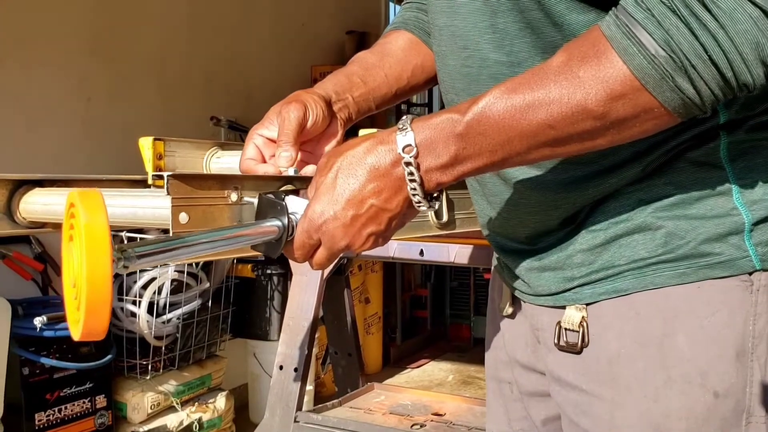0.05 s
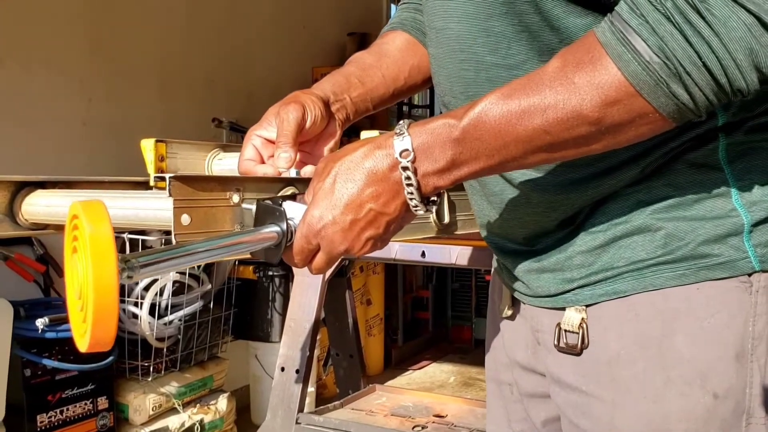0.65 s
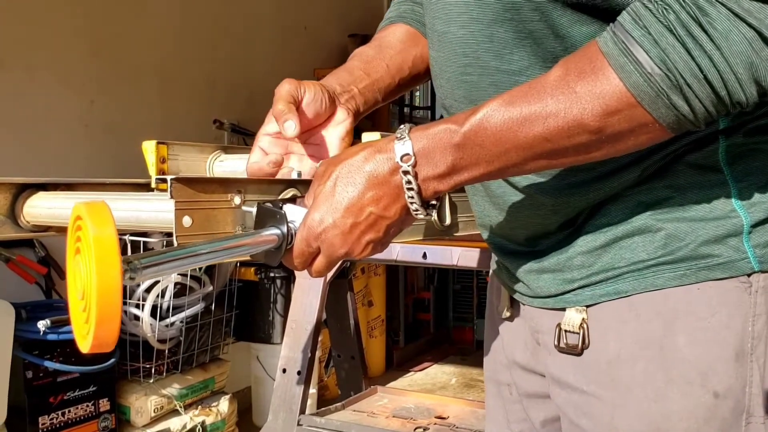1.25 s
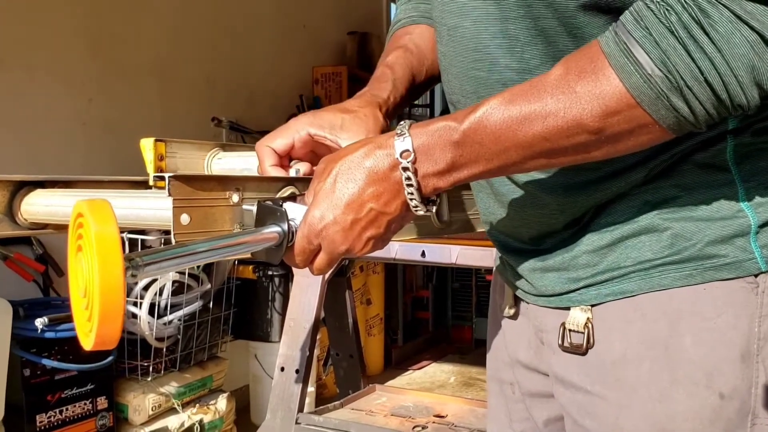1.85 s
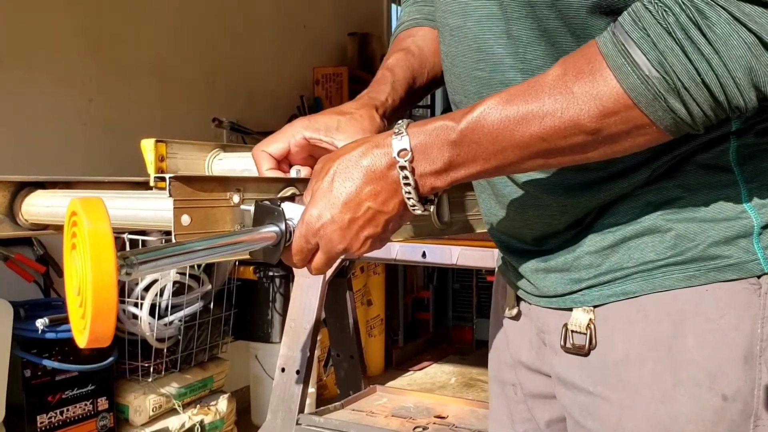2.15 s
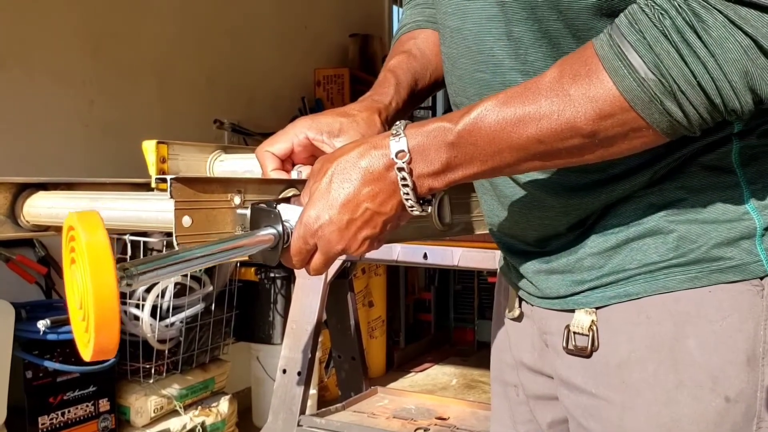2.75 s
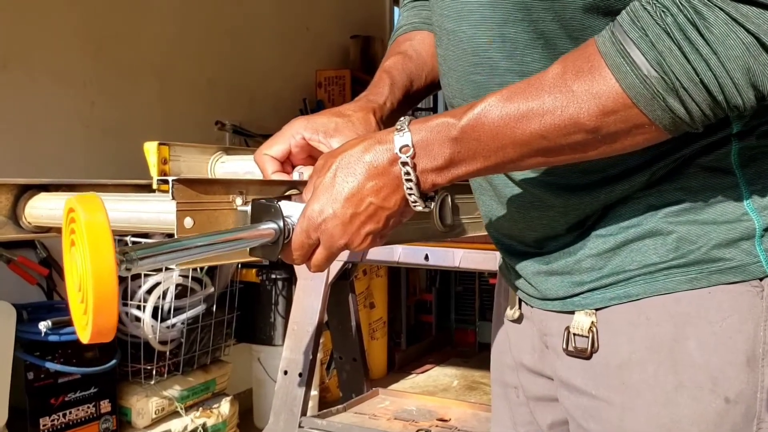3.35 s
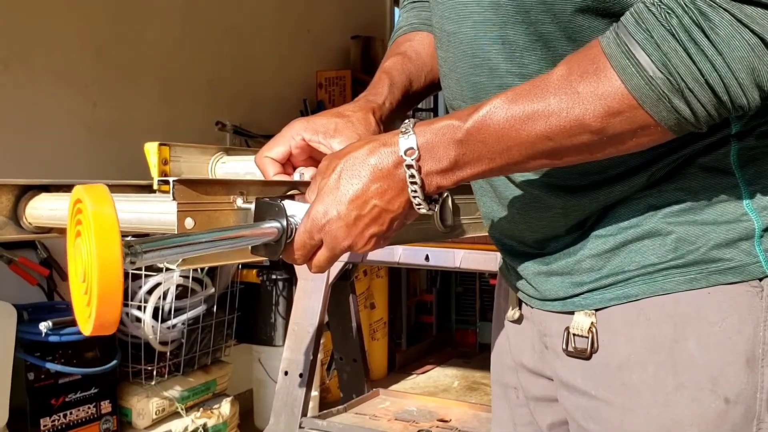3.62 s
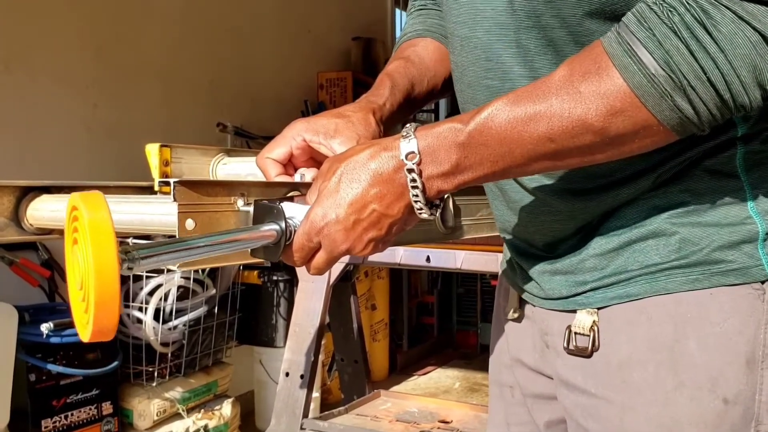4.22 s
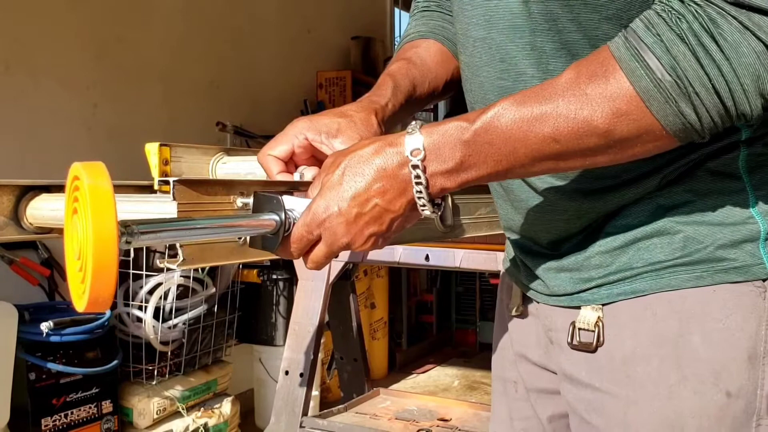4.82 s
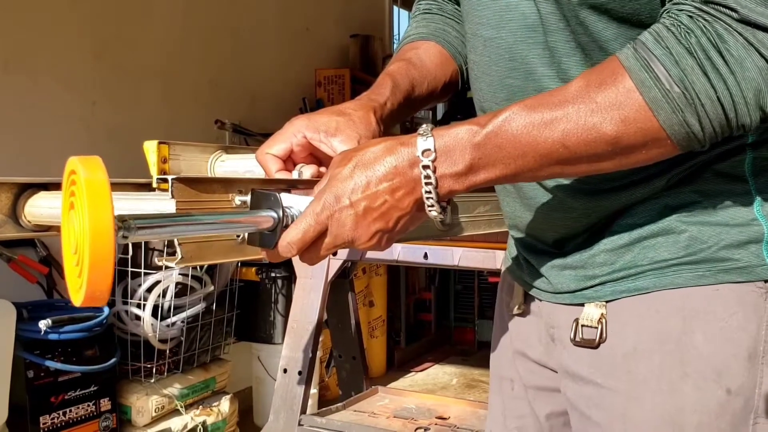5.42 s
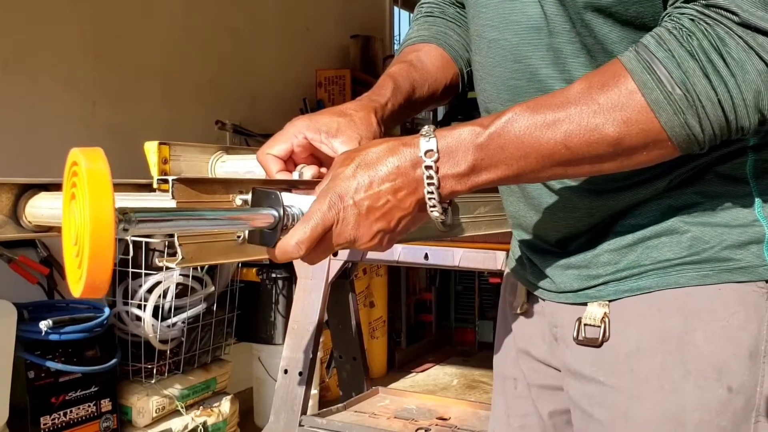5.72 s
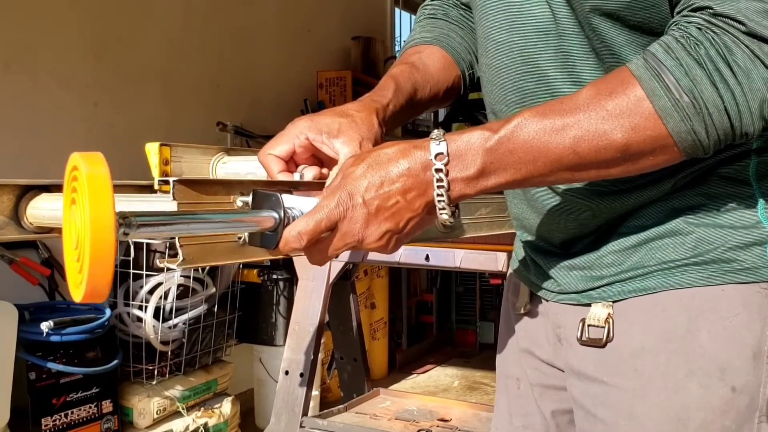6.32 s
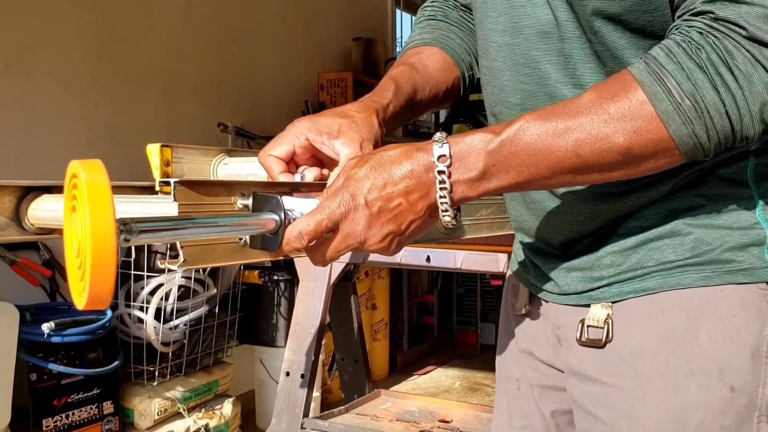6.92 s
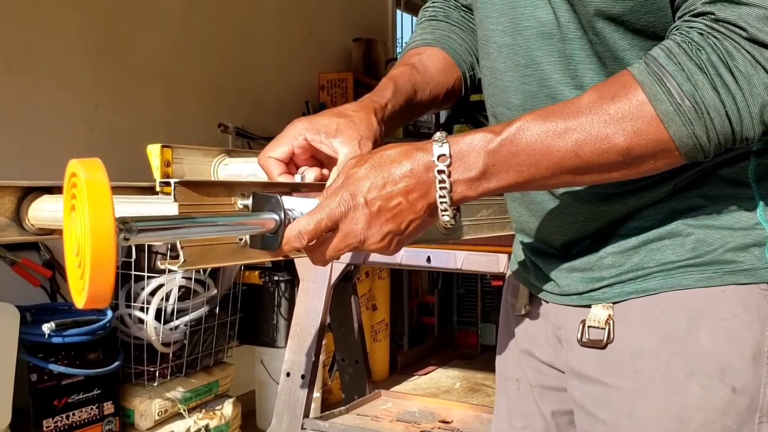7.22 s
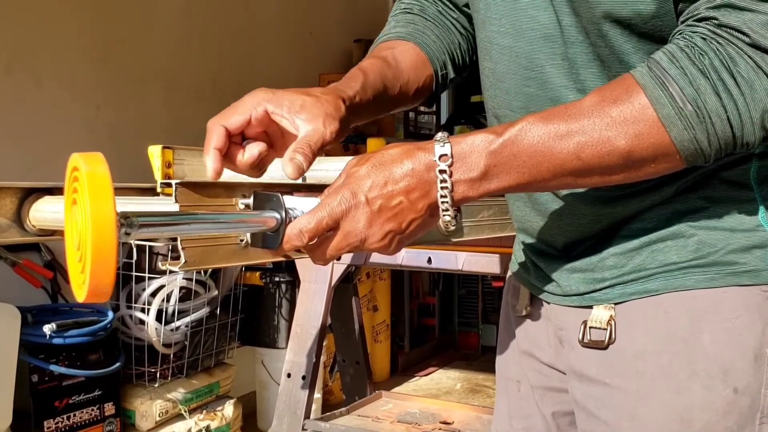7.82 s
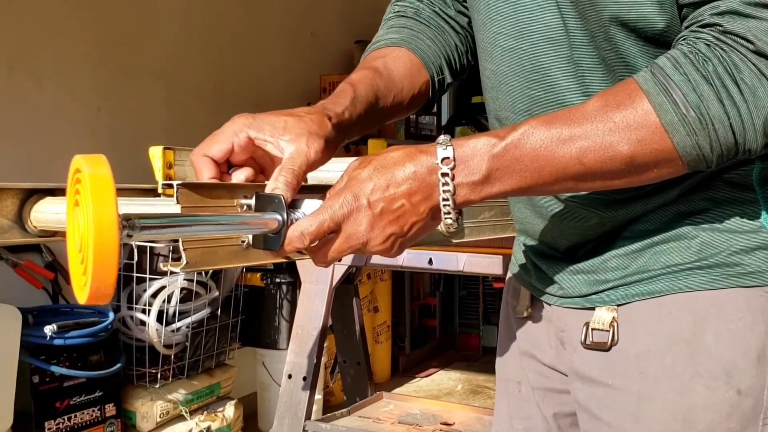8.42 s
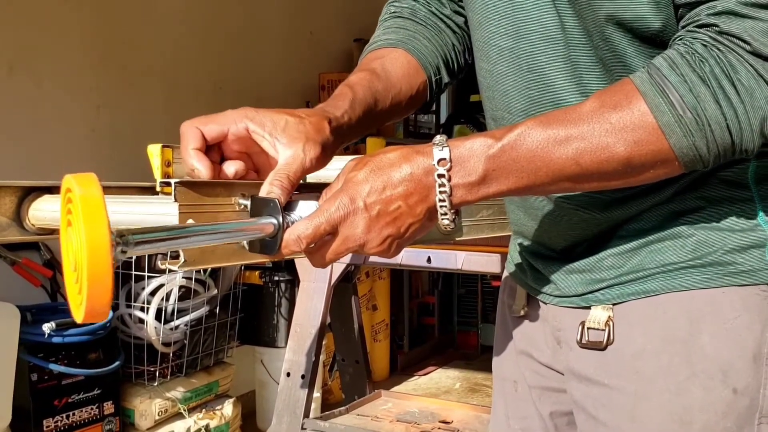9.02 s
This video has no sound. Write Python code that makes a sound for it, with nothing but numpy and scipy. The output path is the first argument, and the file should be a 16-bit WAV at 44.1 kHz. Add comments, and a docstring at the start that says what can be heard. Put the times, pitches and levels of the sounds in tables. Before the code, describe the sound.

A bolt scratches and clinks along an aluminium ladder rail, then drops into a steel bracket with a sharp clank. A metal tube thuds and knocks as it is rocked into line, its collar clacks into place, and a few faint scrapes and ticks follow. The sounds are close and slightly left, with a short echo from bare garage walls and a faint low machine hum behind.

```python
"""A steel leveller leg is fitted by hand to an aluminium ladder rail, heard close up in a garage.
A bolt scratches and taps along the rail and drops into its bracket; the tube knocks until its collar
seats. Each contact is a run of tiny slips that rings the metal, with small snaps and squeaks between.
The work sits nearer the left microphone of a stereo pair, and bare walls answer every contact.
Further off, a machine hums low through the walls under the steady air of the room."""
import sys
import numpy as np
from scipy import signal
from scipy.fft import rfft, irfft, next_fast_len
from scipy.io import wavfile

SR = 44100
rng = np.random.default_rng(int(sys.argv[2]) if len(sys.argv) > 2 else 0)


def wav_record(signal):
    """Record a signal, one row per channel, as 16-bit PCM in the file named by sys.argv[1]."""
    frames = np.transpose(np.atleast_2d(signal))
    bounded = np.clip(frames, -1, 1)
    # unit amplitude maps onto the largest positive 16-bit level
    quanta = np.round(bounded * 32767).astype(np.int16)
    wavfile.write(sys.argv[1], SR, quanta)


N = 403956

# The straight path leans left. Each row: frequency in Hz, dB added on the left and taken off the right.
LEFT_LEAN = [(500, 1.5), (2000, 2), (5000, 5), (11000, 12.5)]


def rail():
    """The bolt feels its way along the aluminium rail, which clinks."""
    taps = [(.204, -14.5, 16, -3, 0.5, 0.018), (.34, -19.5, 0, -9, -18, 0.15),
            (.461, -16, 12.5, 2.5, -10, 0.013), (.565, -12, 8.5, -3, -19, 0.019),
            (.577, -1.5, 1.5, 0.5, -19, 0.032), (.819, -6, -9, 5, -22, 0.014),
            (.851, -15, -10, -3, 6, .0024), (.858, 8, 1, 1, -9, 0.011), (.869, 1, 14.5, 3, -4, 0.035),
            (.922, -10.5, 4, 5.5, -26, 0.041), (1.01, -3.5, 7, -1, -6.5, 0.015),
            (1.895, -10, 9.5, -4.5, -9.5, 0.023), (1.937, -18.5, 15, -15, 4, 0.0059),
            (1.948, -24, 13, -3, -2, 0.0086)]  # rows as in blows()
    scratches = [(.146, -13.5, 0.12), (.461, -13.5, 0.068), (.756, -16.5, 0.055), (1.22, -31.5, 0.14),
                 (1.417, -37, 0.03), (1.71, -37, .04), (1.804, -26, 0.06), (2.255, -35, 0.018),
                 (2.384, -18, 0.12)]  # rows as in slides()
    modes = [(880, 5.5, 0.12), (905, -3, .06), (1295, -1, .07), (1682, -1.5, 0.08), (2165, 4.5, 0.05),
             (2660, -4, 0.05), (2860, -5, 0.05), (3275, -0.5, 0.06), (4030, -5, .04), (4075, 0, 0.08),
             (4320, -7, 0.04), (4785, 0.5, .05), (6030, -8, .08), (11400, 0, .02)]  # this and the next: rows as in contacts()
    radiation = [(450, -14), (800, -5), (1100, -7), (2500, -5), (4200, -4), (6000, 1), (9000, -3.5)]
    touches = blows(taps, bass_db=-22.0, middle_db=-3.5, bass_share=0.71, middle_share=0.5)
    touches += slides(scratches, bass_db=-11.5, middle_db=9, treble_db=-15.0, ring_db=0.5)
    return contacts(touches, modes, radiation, level_db=-4.0, modes_db=-16.0, rattle=0.0037,
                    clatter_t60=0.018, grit=0.5, slips_per_s=1700, room_db=3.0)


def bracket():
    """The bolt falls into the steel bracket and rebounds once."""
    clanks = [(2.568, -15, -26.5, 9.5, -13.5, 0.016), (2.579, 7, 0.5, 0, -14.5, .011),
              (2.585, 7, 1.5, 0.5, -6, .009), (2.597, -0.5, 5, -3, -8, .016),
              (2.727, -8.5, -3.5, -2.5, -12, 0.012)]  # rows as in blows()
    modes = [(500, -4, .1), (900, -2.5, 0.1), (1320, -7, 0.06), (2000, -3, .09), (2190, -2, 0.07),
             (3275, 1, 0.08), (3670, -6, .09), (3917, 8, 0.07), (4290, -8, 0.08), (4660, -2.5, .05),
             (5400, -2, 0.11), (6330, -2, .06), (6778, 2, .1), (11420, 4, .06)]  # this and the next: rows as in contacts()
    radiation = [(450, -6), (900, -2), (4000, -2), (9000, 1)]
    touches = blows(clanks, bass_db=-9.0, middle_db=6.0, bass_share=0.49, middle_share=0.94)
    return contacts(touches, modes, radiation, level_db=-1.5, modes_db=-13.5, rattle=0.0016,
                    clatter_t60=0.066, grit=0.93, slips_per_s=2500, room_db=1.5)


def tube():
    """The hand-held tube thuds and scrapes against the rail as it is rocked into line."""
    knocks = [(2.838, 3, 1, -17, -20, 0.0076), (2.849, -1.5, 0, -11, -7.5, 0.013),
              (2.98, -12, -7, 2, -15, 0.0039), (2.991, -17, 2, -1, -15, 0.0053),
              (3.111, -9.5, -4.5, 1, -21, 0.0029), (3.232, -15.5, 0, -0.5, -34, 0.0019),
              (3.757, -29, -3, -4.5, -7.5, 0.037), (3.82, -24, -14, -3, -11, 0.15),
              (4.019, -20, -1, 0, -22.5, 0.011), (4.178, -50, -2.5, 8.5, -16, 0.004),
              (4.364, -41, 7, 1, -29, 0.012), (4.758, -23, -4.5, 5.5, -17, 0.004),
              (4.951, -40, -12, 11.5, -39, 0.0022), (5.476, -4.5, 0.5, -2, -14.5, 0.0039),
              (6.129, -34, -6.5, 7.5, -27, .003), (8.602, -39.5, -6.5, -0.5, -14, 0.0039),
              (8.795, -40.5, -15, 0, 0.5, 0.0018), (8.863, -17, -22, 0, -23, .002),
              (8.912, -28.5, -22, 10, -15, .0015), (8.923, -38.5, -26, 4, -21, 0.0053)]  # rows as in blows()
    scrapes = [(.923, -10.5, 0.037), (2.813, -4, 0.021), (2.828, -8, 0.024), (3.5, -33.5, 0.017),
               (5.51, -12, 0.084), (5.711, -28, 0.014), (6.07, -21, 0.0044), (6.5, -15, 0.16),
               (6.681, -30, 0.02), (8.23, -20, 0.087), (8.713, -35, 0.22), (8.83, -23.5, 0.033),
               (8.871, -15.5, 0.0053), (9.064, -24, 0.022), (9.14, -22, 0.016)]  # rows as in slides()
    modes = [(496.2, -1.5, 0.22), (634, 0, 0.037), (1148, 2.5, 0.1), (1684, 8, 0.041), (2136, -1, 0.093),
             (2360, -20, 0.073), (2576, 9, 0.044), (3360, -11, 0.074), (3990, -2, 0.027),
             (4805, 8.5, 0.021)]  # this and the next: rows as in contacts()
    radiation = [(330, -6.5), (500, 0.5), (650, 0), (860, -0.5), (1150, 1), (1450, 2), (1750, 3.5),
                 (4000, -2), (4900, 0.5), (5700, -1), (6600, 2), (9000, 4)]
    touches = blows(knocks, bass_db=-0.5, middle_db=-1.5, bass_share=0.56, middle_share=0.32)
    touches += slides(scrapes, bass_db=-2, middle_db=-3.5, treble_db=-12.5, ring_db=-6.0)
    return contacts(touches, modes, radiation, level_db=1.5, modes_db=-22.0, rattle=0.021,
                    clatter_t60=0.017, grit=1.0, slips_per_s=870, room_db=2.5)


def collar():
    """The collar catches, then clacks onto its seat."""
    clacks = [(6.326, -22, -24, 4, 12, 0.013), (6.3325, -3.5, -2, 9, -8, 0.0056),
              (6.341, -5.5, -3.5, 5, -4, 0.0034), (6.353, -2, 2, -10, -2.5, 0.0063),
              (6.446, -7.5, -1, 1.5, -3, 0.002)]  # rows as in blows()
    modes = [(1225, 5.5, 0.058), (1978, 5.5, 0.18), (2200, 3.5, 0.065), (2504, 5.5, 0.049),
             (3360, 5, 0.097), (3820, 5.5, 0.065), (4940, -1, 0.103), (6850, -9, .11), (11000, -21, .06)]  # this and the next: rows as in contacts()
    radiation = [(330, 0.5), (500, -1), (660, 4.5), (880, -11.5), (1200, 7.5), (1600, -7.5), (2200, -1.5),
                 (4000, -4.5), (9000, -0.5)]
    touches = blows(clacks, bass_db=-4.0, middle_db=8.0, bass_share=0.47, middle_share=0.05)
    return contacts(touches, modes, radiation, level_db=0.5, modes_db=-25, rattle=0.015,
                    clatter_t60=0.018, grit=0.96, slips_per_s=2200, room_db=1.34)


def blows(table, bass_db, middle_db, bass_share, middle_share):
    """A lighter blow is duller: bass and middle gain part of each dB lost."""
    # Each row: start in seconds, strength in dB, weight (a blunt contact's low end) in dB, ring (clear
    # modes over clatter) in dB, edge (a sharp corner's treble) in dB, drag in seconds.
    touches = []
    for start, db, weight_db, ring_db, edge_db, drag in table:
        bass = bass_db - bass_share * db + weight_db
        middle = middle_db - middle_share * db + weight_db / 2
        touches.append((start, db, bass, middle, edge_db, ring_db, drag))
    return touches


def slides(table, bass_db, middle_db, treble_db, ring_db):
    """Sliding has the colour of the two surfaces, however hard they are pressed."""
    # Each row: start in seconds, strength in dB, drag in seconds.
    return [(start, db, bass_db, middle_db, treble_db, ring_db, drag) for start, db, drag in table]


def contacts(touches, modes, radiation, level_db, modes_db, rattle, clatter_t60, grit, slips_per_s,
             room_db):
    """Each contact is a run of tiny slips that rings a part's clear modes and its dense, brief ones."""
    # Each row of modes: frequency in Hz, relative level in dB, t60 in seconds before the hands damp it.
    # Each row of radiation: frequency in Hz, gain of the dense modes in dB.
    # High modes beam at the microphones. Each row: frequency in Hz, dB gained ahead and lost sideways.
    beaming = [(500, 1.5), (900, 1), (2000, 2.5), (4000, 5.5)]
    # The colour common to all contacts. Each row: frequency in Hz, gain in dB.
    common_colour = [(60, -28.5), (150, -1), (250, -9), (350, -0.5), (500, 2), (750, -2.5), (1500, -4),
                     (2300, 1), (4200, 2), (5500, -2), (7000, -5.5), (8200, -15), (9500, -3), (12000, -0.5),
                     (14500, -6)]
    band_centres_hz = [480, 1500, 4200, 11000]  # bass, middle, presence, treble
    grip_t60, grip_detune = 0.15, 0.002  # the hands cap the ring (s); their shifting grip varies pitch
    spot_db, onset_share = 2, 0.07  # each struck spot favours some modes; share of a drag spent building
    track, t = np.zeros((2, N)), np.arange(SR // 3) / SR
    mode_hz, mode_db, t60 = np.transpose(modes)[:, :, None]
    t60 = np.minimum(t60, grip_t60)
    beam = amp(along(beaming, mode_hz))
    for start, db, bass_db, middle_db, treble_db, ring_db, drag in touches:
        # A few roughness peaks catch much harder than the rest; the force falls 20 dB over the drag.
        slips = rng.standard_normal(len(t)) * np.exp(grit * rng.standard_normal(len(t)))
        slips *= rng.random(len(t)) < slips_per_s / SR
        slips *= 10 ** (-t / max(drag, .001))
        # Short contacts open with a real blow, long ones just start to slide.
        slips *= 1 - np.exp(-t / (onset_share * drag))
        slips[0] += 5 * np.exp(-drag / 0.0083)
        slips /= np.linalg.norm(slips)
        pitch = mode_hz * (1 + grip_detune * rng.standard_normal(t60.shape))
        # The loose joint rattles, which smears each mode over a small share of its pitch.
        phase_step = np.sqrt(2 * np.pi * rattle * mode_hz / SR)
        smear = phase_step * np.cumsum(rng.standard_normal((len(modes), len(t))), axis=1)
        tones = fade(t, t60) * np.sin(2 * np.pi * pitch * t + smear)
        rings = signal.fftconvolve(slips[None], tones, axes=1)[:, :len(t)]
        strengths = amp(modes_db + ring_db + mode_db + spot_db * rng.standard_normal(t60.shape))
        rings = strengths * rings / np.linalg.norm(rings, axis=1, keepdims=True)
        # Every slip meets a new spot, so the dense modes answer as fresh noise under the slips' energy.
        energy = np.abs(signal.fftconvolve(slips ** 2, fade(t, clatter_t60) ** 2)[:len(t)])
        clatter = rng.standard_normal(len(t)) * np.sqrt(energy / energy.sum())
        clatter = causal(clatter, lambda hz: along(radiation, hz))
        # Hard corners sound bright, padded contacts dull.
        hardness = list(zip(band_centres_hz, [bass_db, middle_db, 0, treble_db]))
        colour = lambda hz: along(hardness, hz) + along(common_colour, hz)
        straight = causal(clatter + np.sum(rings * beam, axis=0), colour)
        spill = causal(clatter + np.sum(rings / beam, axis=0), colour)
        add(track, start, amp(db + level_db) * garage(straight, spill, room_db))
    return track


def snaps():
    """Tiny dry clicks: hard edges snap past each other, and some tube and collar knocks open with a short mid
    punch; brighter ones beam at the left microphone."""
    # Each row: start in seconds, centre in Hz, half-width in Hz, strength in dB, t60 in seconds.
    clicks = [(0.848, 11000, 2200, -29, 0.023), (.996, 11500, 2000, -43, 0.015),
              (1.01, 11200, 2230, -31, 0.019), (1.034, 11400, 2000, -33, .012),
              (1.939, 11000, 2000, -39.5, 0.038), (2.5865, 12400, 1204, -19.5, 0.033),
              (2.731, 11500, 2220, -40, .015), (2.842, 12900, 1520, -26.5, 0.13),
              (2.99, 1820, 450, -35, 0.039), (3.231, 1830, 450, -43, .06), (6.069, 4150, 130, -45.5, 0.095),
              (6.073, 11650, 1070, -45.5, 0.24), (6.356, 13600, 2370, -17.5, 0.018),
              (6.446, 1550, 500, -37, 0.034), (6.448, 12200, 2000, -40, .06),
              (8.836, 12500, 1800, -49, .02), (8.871, 4500, 1100, -43, 0.014),
              (8.912, 12300, 1500, -42.5, .02), (9.07, 12800, 890, -41.5, 0.032)]
    track, t = np.zeros((2, N)), np.arange(SR // 10) / SR
    for start, hz, width_hz, db, t60 in clicks:
        click = amp(db) * fade(t, t60) * narrow(len(t), hz, width_hz)
        balance = amp([[0], [-along(LEFT_LEAN, hz)]])
        add(track, start, balance * garage(click, click, room_db=-10))
    return track


def squeaks(rise_s=0.0069):
    """Faint rubs and squeaks as the parts shift, each catching one resonance."""
    # Each row: start in seconds, centre in Hz, half-width in Hz, strength in dB, length in seconds.
    rubs = [(3.749, 485, 133, -53, 0.082), (4.531, 1169, 15, -53, 0.022), (5.195, 1203, 51, -53.5, 0.012),
            (5.196, 1948, 27, -49, 0.013), (5.233, 2420, 620, -60, 0.03), (5.326, 7040, 930, -65, 0.074),
            (6.927, 2850, 90, -73, 0.033), (6.977, 3120, 63, -78, 0.086), (7.162, 3110, 70, -95, .1),
            (7.524, 1750, 650, -69, 0.042), (7.543, 567, 185, -58, 0.046), (7.696, 6950, 670, -61, 0.031),
            (7.876, 650, 29, -66.5, 0.048), (9.115, 2630, 260, -58, 0.067)]
    track, t = np.zeros((2, N)), np.arange(SR // 3) / SR
    for start, hz, width_hz, db, length in rubs:
        swell = (1 - np.exp(-t / rise_s)) * np.exp(-(t / length) ** 2)
        rub = amp(db) * swell * narrow(len(t), hz, width_hz)
        add(track, start, garage(rub, rub, room_db=-1))
    return track


def garage(sound, spill, room_db, build_s=0.0012, right_lag_s=0.000095):
    """Sound reaches the left microphone first; the walls answer the sideways spill, anew for each spot."""
    # The decay between bare walls. Each row: frequency in Hz, t60 in seconds.
    wall_decay = [(200, 0.94), (500, 0.66), (1500, 0.35), (4000, 0.43), (8000, 0.33), (14000, 0.18)]
    # The straight path to the microphones. Each row: frequency in Hz, gain in dB.
    straight_path = [(300, -23.5), (600, -8), (1500, -4.5), (4000, -5.5), (12000, -15.5)]
    hz, t, spectra = signal.stft(diffuse(SR // 2), SR, nperseg=256)
    decay = fade(t, along(wall_decay, hz)[:, None]) * (1 - np.exp(-t / build_s))
    decay /= np.sqrt(np.sum(decay ** 2, axis=1, keepdims=True) * t[1] * SR)  # equal energy in each band
    tail = signal.istft(spectra * decay, SR, nperseg=256)[1]
    pair = amp(room_db) * signal.fftconvolve(spill[None], tail, axes=1)
    left = causal(sound, lambda f: along(straight_path, f) + along(LEFT_LEAN, f))
    right = causal(sound, lambda f: along(straight_path, f) - along(LEFT_LEAN, f))
    pair[0, :len(sound)] += left
    pair[1, :len(sound)] += filtered(right, lambda f: np.exp(-2j * np.pi * f * right_lag_s))
    return pair


def hum(swell_share=0.93):
    """A machine drones through the walls; its strongest band swells and sinks."""
    # The drone's bands. Each row: centre in Hz, half-width in Hz, relative level in dB.
    bands = [(27.4, 3.1, -79), (40, 1.1, -65), (54, 7, -57), (78.2, 7.8, -61.5), (95.1, 8.7, -67.5),
             (122.7, 2.2, -72.5), (239.8, 3.5, -84.5)]
    # The swell's outline. Each row: time in seconds, level in dB (only its swing about the mean counts).
    outline = [(0.0, -61.5), (0.12, -50.5), (0.2, -58.5), (0.92, -52), (1.35, -79), (1.68, -51),
               (1.81, -66), (2.6, -64), (2.73, -51), (3.21, -63.5), (3.39, -51.5), (3.9, -67), (4.738, -51),
               (5.81, -63), (6.33, -52), (8.62, -59), (8.75, -51.5), (9.16, -59.5)]
    times, db = np.transpose(outline)
    swell = amp(swell_share * np.interp(np.arange(N) / SR, times, db - np.mean(db)))
    strongest = np.argmax(np.array(bands)[:, 2])
    drone = sum(amp(level) * narrow(N, hz, width) * (swell if k == strongest else 1)
                for k, (hz, width, level) in enumerate(bands))
    return drone * amp([[.4], [-.4]])  # a touch louder on the left


def air(level_db=-64):
    """The steady rumble and hiss of the room, all around the microphones."""
    # Each row: frequency in Hz, relative spectral density in dB.
    spectrum = [(50, -33.5), (85, -8.5), (149, -20), (245, -23.5), (370, -32.5), (480, -34), (535, -38),
                (2430, -44.5), (3020, -45.5), (3370, -43.5), (8010, -58), (13800, -40), (15000, -57)]
    return amp(level_db) * unit(filtered(diffuse(N), lambda hz: amp(along(spectrum, hz))))


def diffuse(n):
    """White noise from all sides: alike at both microphones only in the bass."""
    # Each row: frequency in Hz, correlation of left and right.
    likeness = [(60, 0.76), (130, 0.63), (290, 0.79), (640, 0.32), (1400, -0.064), (3000, 0.13),
                (15000, -0.044)]
    angle = lambda hz: np.arccos(np.clip(along(likeness, hz), -1, 1)) / 2
    mid_side_gains = lambda hz: np.array([np.cos(angle(hz)), np.sin(angle(hz))])
    mid, side = filtered(rng.standard_normal((2, n)), mid_side_gains)
    return np.array([mid + side, mid - side])


def narrow(n, centre_hz, width_hz):
    """A wavering tone: noise through one steep resonance."""
    return unit(filtered(rng.standard_normal(n), lambda hz: 1 / (1 + ((hz - centre_hz) / width_hz) ** 4)))


def fade(t, t60):
    """A decay of 60 dB every t60 seconds."""
    return amp(-60 * t / t60)


def amp(db):
    """Decibels to gain."""
    return 10 ** (np.asarray(db) / 20)


def unit(x):
    """Scale to rms 1."""
    return x / np.sqrt(np.mean(x ** 2) + 1e-20)


def along(points, hz):
    """Read (Hz, value) points on a log axis."""
    point_hz, values = np.transpose(points)
    return np.interp(np.log(hz + 1), np.log(point_hz), values)


def filtered(x, response):
    """Multiply the spectrum of x by a function of frequency."""
    n = x.shape[-1]
    size = next_fast_len(n + SR // 10)
    return irfft(rfft(x, size) * response(np.fft.rfftfreq(size, 1 / SR)), size)[..., :n]


def causal(x, db_of, size=2048):
    """Colour x with a dB curve at minimum phase, so no sound comes ahead of the attack."""
    cepstrum = irfft(np.log(amp(db_of(np.fft.rfftfreq(size, 1 / SR)))))
    cepstrum[1:size // 2] *= 2
    cepstrum[size // 2 + 1:] = 0
    return signal.fftconvolve(x, irfft(np.exp(rfft(cepstrum))))[:len(x)]


def add(track, start_s, sound):
    """Mix a sound into the track at start_s."""
    start = max(round(start_s * SR), 0)
    track[:, start:start + sound.shape[-1]] += sound[:, :N - start]


def scene():
    """Four metal parts close by, their snaps and squeaks, and the background behind them."""
    return rail() + bracket() + tube() + collar() + snaps() + squeaks() + hum() + air()


def record(dry, top_hz=14950):
    """The recorder cuts off steeply at its band limit."""
    return filtered(dry, lambda hz: 1 / (1 + (hz / top_hz) ** 120))


dry = scene()
out = record(dry)
wav_record(out)
```